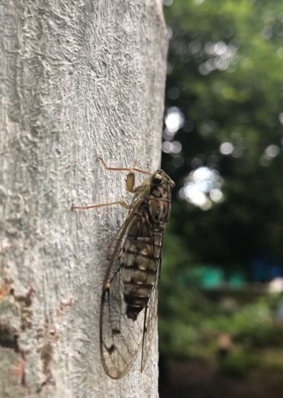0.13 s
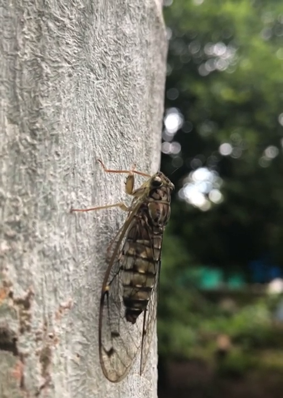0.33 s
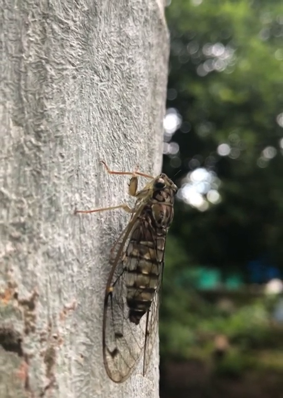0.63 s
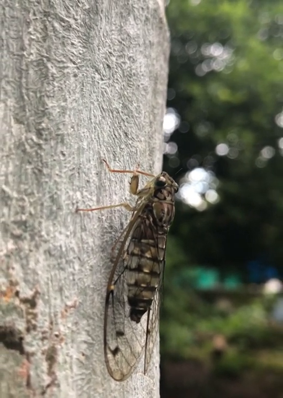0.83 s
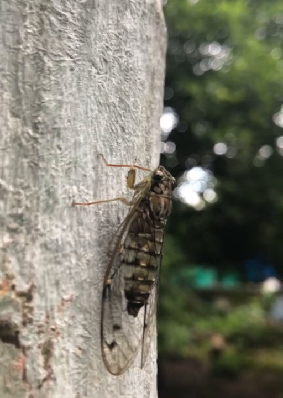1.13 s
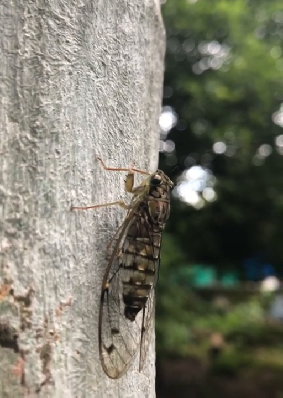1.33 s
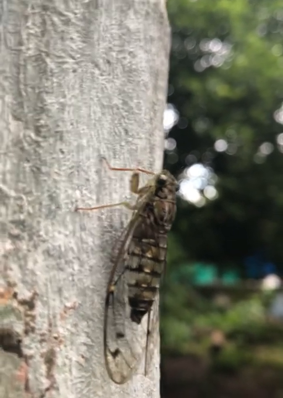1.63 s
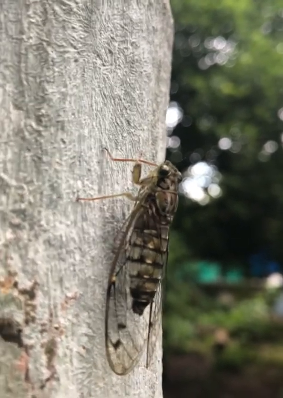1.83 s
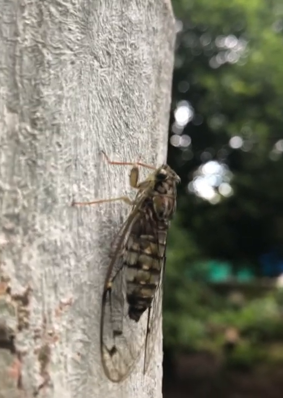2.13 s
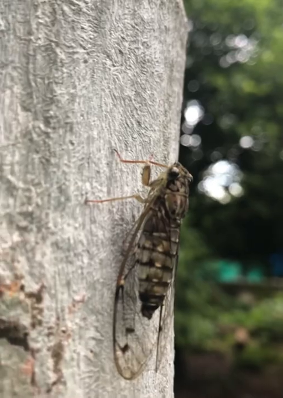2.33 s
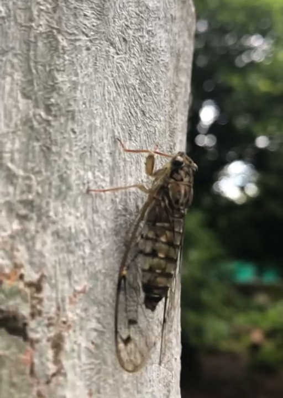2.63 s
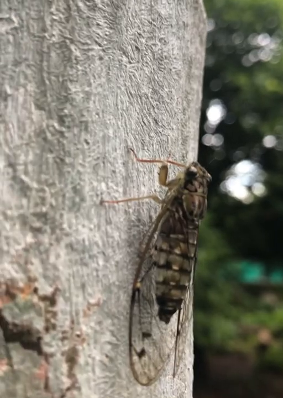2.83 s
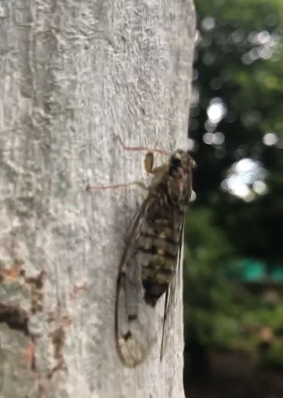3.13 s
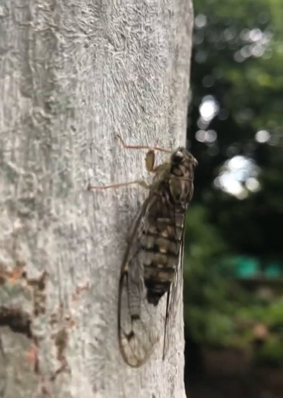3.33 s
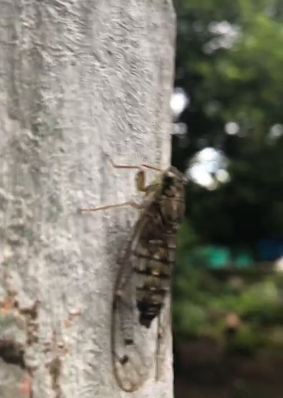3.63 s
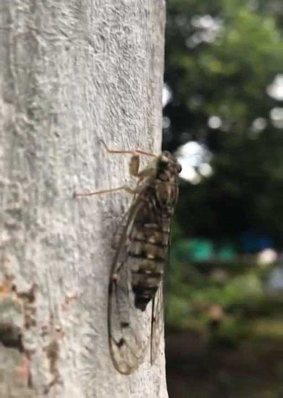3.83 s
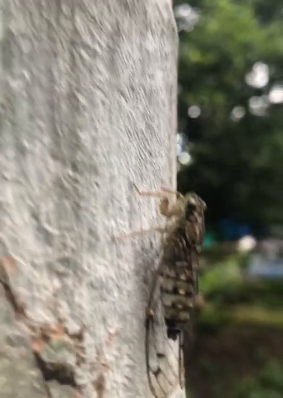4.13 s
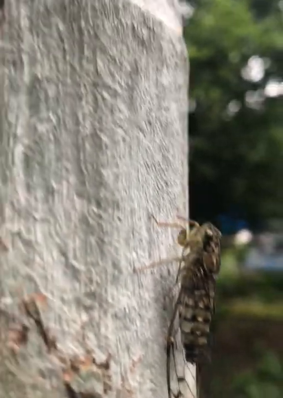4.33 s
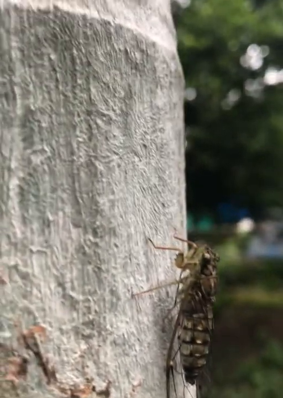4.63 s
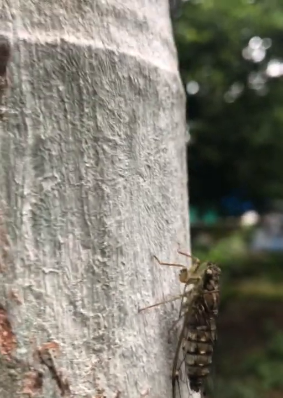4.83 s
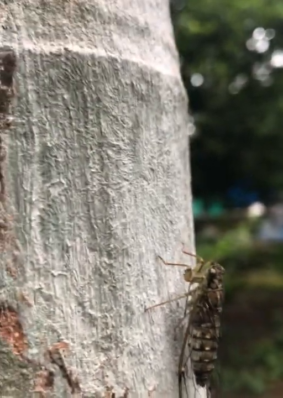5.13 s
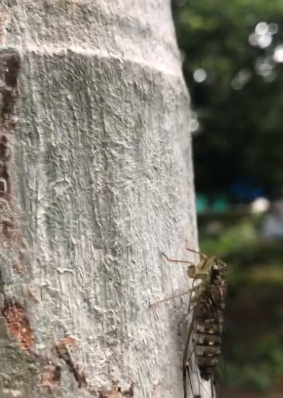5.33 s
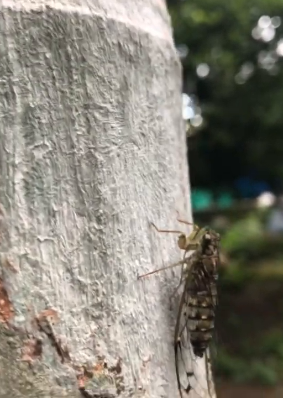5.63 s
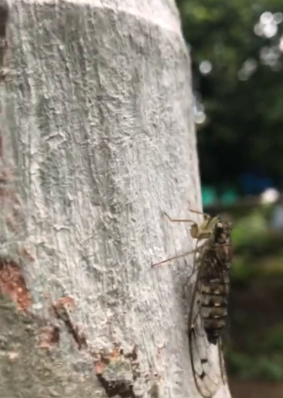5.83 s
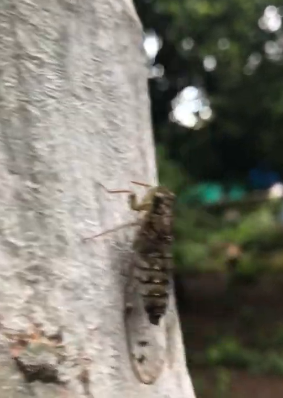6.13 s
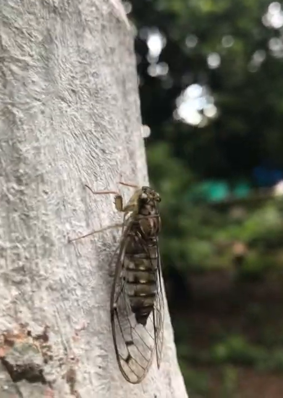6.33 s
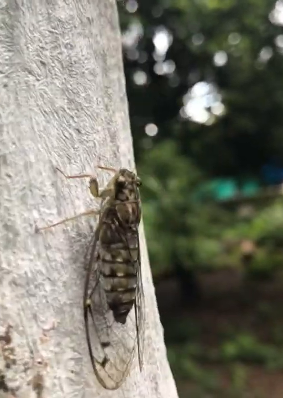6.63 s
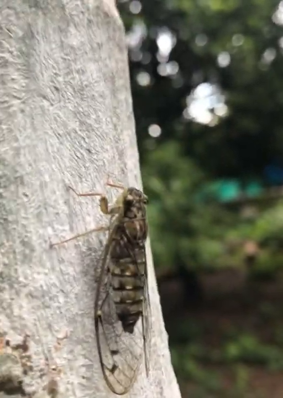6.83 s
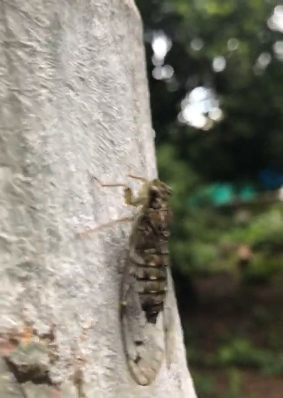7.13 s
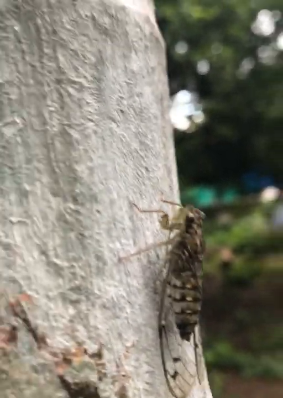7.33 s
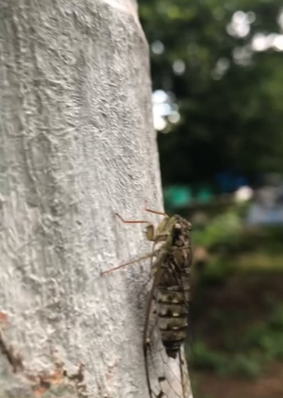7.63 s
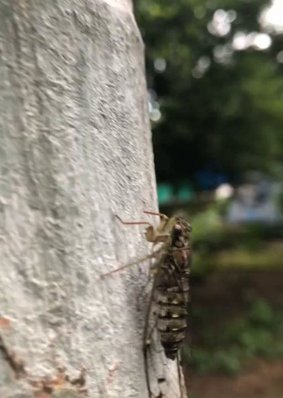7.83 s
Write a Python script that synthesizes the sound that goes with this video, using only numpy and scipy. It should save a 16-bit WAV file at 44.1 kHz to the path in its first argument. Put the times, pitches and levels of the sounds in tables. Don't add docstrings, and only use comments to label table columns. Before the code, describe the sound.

From 0 to 2.8 s a cicada, a hand's width from the phone, sings very loudly. Dense dry clicks form buzzing phrases about a tenth of a second long, roughly seven a second, each hurrying from loose, softer ticks into a bright ringing roll around 9 kHz over a 2 kHz rasp; pitch bobs slightly upward every 0.4 s. From 2.8 s phrases become tiny chirps of four to eight clicks, about twenty a second, still loud. After 4.1 s the level falls sharply, the chirps space out to about fourteen a second, and the high ring thins, leaving a lower, raspier tone. Brief surges come at 6.7, 7.35 and strongest at 7.7 s, then weak, crowded chirps. Distant cicadas shrill thinly throughout, clearer early and late. Far hoarse cock calls are nearly buried near 2, 4 and 6.3 s, clearest starting at 7.8 s. Soft air and low rumble lie beneath; almost no echo.

```python
import sys
import numpy as np
from scipy import signal
from scipy.fft import rfft, irfft, next_fast_len
from scipy.io import wavfile
from scipy.ndimage import uniform_filter1d, minimum_filter1d, map_coordinates

SR = 44100
rng = np.random.default_rng(int(sys.argv[2]) if len(sys.argv) > 2 else 0)


def how_loud(loudness_db):
    steps = np.asarray(loudness_db, float) / 20
    return 10 ** steps


def generate_wav(sig):
    pcm = np.round(np.clip(np.atleast_2d(sig).T, -1, 1) * 32767).astype(np.int16)
    wavfile.write(sys.argv[1], SR, pcm)


N = 351918


def unit(x):
    return x / np.sqrt(np.mean(x ** 2) + 1e-20)


def curves(rows, t):
    s, *columns = np.transpose(rows)
    return [np.interp(t, s, column) for column in columns]


def wobble(rate):
    knots = rng.standard_normal(int(N * rate / SR) + 4)
    return map_coordinates(knots, [np.arange(N) * rate / SR])


def filtered(x, response):
    size = next_fast_len(len(x) + 8192)
    spectrum = rfft(x, size) * response(np.fft.rfftfreq(size, 1 / SR))
    return irfft(spectrum, size)[:len(x)]


def hiss(spectrum):
    f, db = np.transpose(spectrum)
    colour = lambda hz: how_loud(np.interp(np.log(hz + 1), np.log(f), db, -120, -120))
    return unit(filtered(rng.standard_normal(N), colour))


def narrow(peaks):
    shape = lambda f: sum(how_loud(db) / (1 + (2 * (f - c) / w) ** 2) for c, w, db in peaks)
    return unit(filtered(rng.standard_normal(N), shape))


def cicada():
    s, db = buckles()
    luck = rng.standard_normal((len(s), 17))
    near = np.exp(-.5 * ((s[:, None] - s) / .15) ** 2)
    slow_db = near @ db / near.sum(1)
    jump_db = db - slow_db
    effort = np.clip((db + 9) / 7, 0, 1)[:, None]
    pause_ms = np.clip(np.abs(np.diff(s, prepend=0)) * 1000 - 3.6, 0, 20)[:, None]
    colours = overtone_balance(s, jump_db, pause_ms[:, 0])
    steps = np.arange(-130, 400)
    ms = steps * 1000 / SR
    rows = np.clip(np.round(s * SR).astype(int)[:, None] + steps, 0, N - 1)
    slip = np.cumsum((.025 + .11 * pause_ms) * luck[:, [1]], axis=0)
    turns = np.cumsum(rib_rate(np.arange(N) / SR)) / SR
    cycles = turns[rows] + slip
    pulse_db = slow_db + (1.1 - .8 * effort[:, 0]) * luck[:, 2]
    rasp = None
    pulse = np.zeros(rows.shape)
    for k, colour in enumerate(colours):
        scatter_db = 0 if k == 3 else .5
        base_db = pulse_db + colour + scatter_db * luck[:, 3 + k]
        pulse += overtone(k, ms, cycles, base_db, jump_db, effort, 1 + .05 * luck[:, [10 + k]])
    pulse += rib_scrape(rows, ms, slow_db + 0.55 * colours[2], effort, pause_ms)
    return np.bincount(rows.ravel(), pulse.ravel(), N)


# (level/dB, share of the effort followed, rise/ms, soft fall/ms,
# loud fall/ms, soft onset bend/Hz, loud onset bend/Hz, glide/Hz per ms, roughness)
OVERTONE_STACK = [
    (-0.5, -0.093, 0.59, 2.1, 2.03, 178, 343, 3, 0.044),
    (-3, -0.45, 1, 1.9, 2.6, 273, 185, -16, 0.079),
    (-6.5, 0.41, 1, 2.1, 0.45, 14, 18, 101, 0.13),
    (0.06, 0.97, 0.42, 1.2, 1.4, -150, -96, 35, 0.0074),
    (-0.6, 1, 0.29, 0.36, 1.9, -30, -30, 40, 0.21),
    (2.5, 1.2, 0.98, 0.32, 0.83, -200, -100, 74, 0.49),
    (-5, 1.3, 1, 2.6, 0.66, -200, -100, 74, .35),
]
AFTER_RING_DB = [-12, -11, -26, -32, -30, -34, -34]


def overtone(k, ms, cycles, base_db, jump_db, effort, uneven):
    gain_db, share, rise, soft, loud, soft_hz, loud_hz, glide_hz, rough = OVERTONE_STACK[k]
    level = how_loud(base_db + gain_db + share * jump_db)
    fall = (soft + (loud - soft) * effort) * uneven
    width_ms = np.where(ms < 0, rise * (1.3 - 0.32 * effort), fall)
    shape = np.exp(-.5 * np.abs(ms / width_ms) ** (2.6 - 0.76 * effort))
    after = np.exp(-np.abs(ms) / np.where(ms < 0, .3, 3)) * np.cos(ms / ms[-1] * np.pi / 2)
    shape += how_loud(AFTER_RING_DB[k]) * after
    bend_hz = (soft_hz + (loud_hz - soft_hz) * effort) * np.exp(-np.maximum(ms + 0.65, 0) / 0.46)
    off_hz = bend_hz + glide_hz * np.minimum(ms, 3.5)
    off_cycles = (np.cumsum(off_hz, axis=1) - off_hz[:, ms < 0].sum(1, keepdims=True)) / SR
    phase = 2 * np.pi * ((k + 1) * cycles + off_cycles)
    ribs = np.exp(-.5 * ((ms - ms[::12, None]) / .25) ** 2) * .8
    drift = rough * (1.4 - 0.84 * effort) * (rng.standard_normal((2, len(level), len(ribs))) @ ribs)
    return level[:, None] * shape * (1 + drift[0]) * np.sin(phase + drift[1])


# (f/Hz, level/dB)
SCRAPE_COLOUR = [(1300, -60), (1700, -11), (3300, -11), (5500, -0.5), (7600, 6), (10500, 7), (12000, -14.5),
                 (16200, -8)]


def rib_scrape(rows, ms, base_db, effort, pause_ms):
    rasp = hiss(SCRAPE_COLOUR)
    rasp_top = filtered(rasp, lambda hz: hz > 9600)
    hush = how_loud(-16 * effort * np.clip(1.6 - pause_ms, 0, 1))
    level = how_loud(base_db - 6.5 - 7.35 * effort[:, 0])[:, None]
    puff = np.exp(-.5 * (ms / np.where(ms < 0, .9, 1.6)) ** 2)
    return level * puff * (rasp[rows] + (hush - 1) * rasp_top[rows])


# (t/s, loss of the ring against the first overtone/dB,
# treble thrown back by the bark/dB)
BEAM_SWING = [(0, 4, 1), (1.4, 2, 0.5), (2.1, 0, -0.5), (2.7, 0, 0), (3.6, -1, 1.5), (4.05, 0.5, 2),
              (4.3, 2.5, 2), (4.7, 5.5, 2), (5.2, 7, 1.5), (5.7, 8.5, 2), (6.2, 10.5, 0.5), (6.7, 8.5, -3),
              (7.2, 11, 0), (7.6, 8.5, 0.5), (7.98, 7, 0.5)]
BESIDE_RING_DB = [-26, -29, -29, -27.5]
GAIN_PER_LOSS = [1.02, 1.674, 1.55, 0.065]
BARK_SHARE = [0, 0, 1, 1]


def overtone_balance(s, jump_db, pause_ms):
    off_db, bark_db = curves(BEAM_SWING, s)
    balance = np.c_[BESIDE_RING_DB] + np.c_[GAIN_PER_LOSS] * off_db + np.c_[BARK_SHARE] * bark_db
    first, second, third, upper = balance
    first = first + .3 * np.maximum(jump_db - 2, 0)
    second = second + 1.7 * np.minimum(pause_ms - 1, 2)
    return [first, second, third, 0, (third + upper) / 2, upper, upper]


# (t/s, length/ms, pulses, lazy pulses, soft part under the roll/dB)
LONG_PHRASES = [(0.0037, 85, 22, 7, 4.5), (0.1113, 129.7, 30, 16, 3.5), (0.2853, 108.8, 27, 8, 4),
                (0.4214, 130.7, 31, 16, 3.5), (0.5946, 108, 27, 8, 4.2), (0.7288, 92.6, 24, 6, 4.5),
                (0.8564, 96.5, 24, 8, 4), (0.996, 101.9, 26, 6, 4.5), (1.132, 100.2, 25, 6, 5),
                (1.272, 98.3, 24, 8, 4), (1.4175, 101.5, 26, 6, 4), (1.5539, 88, 23, 4, 5.5),
                (1.681, 96.2, 24, 6, 4.2), (1.8202, 99.7, 26, 4, 5.5), (1.9512, 79, 21, 2, 6),
                (2.0678, 104.7, 26, 6, 4.8), (2.2114, 90.1, 24, 2, 5.5), (2.3347, 65.5, 18, 2, 4.5),
                (2.441, 97.3, 25, 4, 4.5), (2.5766, 73.8, 20, 2, 3.5), (2.6786, 86.1, 22, 6, 3)]
# (t/s, length/ms, pulses, lazy pulses, surge over the chirps/dB)
LATE_RESTARTS = [
    (6.6921, 50.6, 8, 4, 1.5),
    (7.3529, 77.7, 13, 6, 7),
    (7.661, 88.8, 16, 7, 13),
]
# (t/s, pulses)
SHORT_CHIRPS = [(2.7865, 8), (2.8337, 7), (2.8828, 7), (2.9305, 5), (2.9739, 7), (3.0224, 6), (3.0677, 6),
                (3.114, 5), (3.1594, 5), (3.2068, 5), (3.2503, 5), (3.297, 5), (3.3406, 5), (3.3839, 5),
                (3.4299, 4), (3.4734, 4), (3.5183, 5), (3.5652, 5), (3.6112, 4), (3.6565, 4), (3.7067, 5),
                (3.7541, 4), (3.7986, 4), (3.8459, 4), (3.8971, 4), (3.9449, 4), (3.9981, 4), (4.0461, 4),
                (4.093, 4), (4.145, 4),
                (4.198, 5), (4.2513, 4), (4.3045, 4), (4.3587, 4), (4.4157, 4), (4.4732, 4), (4.5316, 4),
                  (4.5886, 4), (4.6413, 4), (4.7046, 4), (4.7688, 4), (4.8293, 4), (4.8949, 4), (4.9628, 4),
                  (5.0217, 4), (5.0841, 4), (5.1434, 4), (5.2069, 4), (5.2697, 3), (5.3301, 4), (5.3974, 4),
                  (5.4639, 4), (5.5354, 4), (5.6054, 4), (5.6737, 4), (5.7437, 4), (5.8149, 4), (5.8894, 4),
                  (5.9592, 3),
                (6.0261, 4), (6.0956, 4), (6.1768, 4), (6.2518, 4), (6.328, 4), (6.4131, 3), (6.4887, 4),
                (6.5697, 3), (6.6473, 3), (6.8135, 5), (6.8974, 4), (6.9757, 4), (7.0472, 4), (7.122, 4),
                (7.1999, 4), (7.2778, 4), (7.5095, 5), (7.5933, 4), (7.8084, 4), (7.8461, 3), (7.8955, 4),
                (7.932, 2), (7.9527, 2), (7.9691, 2)]
# (t/s, peak level/dB)
SONG_STRENGTH = [(0, -2.26), (4.08, -1), (4.145, -3.5), (4.25, -7), (4.36, -7.5), (4.63, -7.5), (4.72, -10),
                 (5.3, -8), (5.55, -9.5), (6.1, -10.5), (6.4, -13), (6.52, -9.5), (6.7, -10.5), (6.85, -15),
                 (7.05, -13), (7.33, -17), (7.62, -14.5), (7.85, -13)]
WEAK_TURNS = [1.0707, 1.078, 1.085, 1.094]


def buckles():
    long_s, long_db = phrases(LONG_PHRASES, 0)
    late_s, late_db = phrases(LATE_RESTARTS, 1)
    short_s = chirps(SHORT_CHIRPS)
    s = np.r_[long_s, short_s, late_s]
    db = np.r_[long_db, 0 * short_s, late_db]
    db[np.abs(s - np.c_[WEAK_TURNS]).argmin(1)] += -5
    return s, db + curves(SONG_STRENGTH, s)[0]


def phrases(rows, lifted):
    roll_ms, swing, unsteady, climb_pulses = 3.75, .075, .05, 7
    times, levels = [], []
    for s, ms, count, lazy, climb_db in rows:
        k = np.arange(int(count))
        lazy_ms = (ms - roll_ms * (count - 1 - lazy)) / lazy
        pairing = swing * (2 * (k[:-1] % 2) - 1)
        scatter = unsteady * rng.standard_normal(len(k) - 1)
        gaps = np.where(k < lazy, lazy_ms, roll_ms)[:-1] * (1 + pairing + scatter)
        times.append(s + ms / 1000 * np.r_[0, np.cumsum(gaps)] / gaps.sum())
        climb = np.sin(np.clip((k - lazy) / climb_pulses, 0, 1) * np.pi / 2) ** 2
        levels.append(climb_db * (climb - 1 + lifted))
    return np.concatenate(times), np.concatenate(levels)


# (t/s, gap between chirp pulses/ms, share of the drag)
CHIRP_PACE = [(2.79, 3.9, 0), (2.9, 4.4, 0), (3.15, 4.7, 0), (3.45, 5.1, 1), (4.0, 5.6, 1), (4.6, 5.95, 1),
              (5.2, 6.5, 1), (6.2, 6.9, 1), (6.9, 6.9, 1), (7.6, 7.1, 1), (7.81, 8, 1)]


def chirps(rows):
    times = []
    for s, count in rows:
        gap_ms, drag = curves(CHIRP_PACE, s)
        gaps = gap_ms * (1 + .11 * drag * (np.arange(int(count) - 1) - 1))
        times.append(s + np.r_[0, np.cumsum(gaps)] / 1000)
    return np.concatenate(times)


# (t/s, f/Hz)
REST_RATE = [(0, 2130), (2.0, 2145), (2.7, 2160), (2.85, 2191), (3.85, 2181), (5.6, 2066), (5.97, 2085),
             (6.5, 2039), (7.6, 2012), (7.98, 2040)]
# (t from its top/s, added f/Hz)
PUMP_SHAPE = [(-.11, -0.5), (-.03, 108.5), (0, 122), (.02, 90), (.06, 60), (.075, 11), (.135, 60), (.21, 0)]
# (t/s, depth)
BELLY_PUMPS = [
    (-.07, 0.64),
    (.235, 0.96),
    (.537, 1.07),
    (.934, 1.05),
    (1.357, 0.99),
    (1.758, 0.85),
    (2.147, 0.73),
    (2.514, 0.54),
    (2.75, 0.38),
]


def rib_rate(t):
    pumps = sum(depth * curves(PUMP_SHAPE, t - s)[0] for s, depth in BELLY_PUMPS)
    surges = 0
    for s, ms, _, _, db in LATE_RESTARTS:
        pull = np.interp(t - s - ms / 1000, [-.035, 0, .03], [0, 1, 0])
        surges = surges + 7.5 * db * pull
    return curves(REST_RATE, t)[0] + pumps + surges


def trees(x):
    t = np.arange(SR // 4) / SR
    tail = rng.standard_normal(len(t)) * how_loud(-60 * t / .1) * (t > .003)
    return signal.fftconvolve(x, tail / np.linalg.norm(tail))[:N]


# (t/s, level/dB)
CHORUS_LEVEL = [(0, -39.5), (1.5, -39), (3, -49), (4.3, -50), (5, -45.5), (6, -43), (7, -43), (7.98, -44.5)]
# (f/Hz, width/Hz, level/dB)
NEIGHBOUR_PEAKS = [(2385, 120, -11), (4650, 400, -18), (7000, 1200, -27), (9350, 520, 0), (14000, 700, -30)]


def chorus(t):
    swell_db = 1.5 * wobble(5) + 2 * wobble(200)
    return how_loud(curves(CHORUS_LEVEL, t)[0] + swell_db) * narrow(NEIGHBOUR_PEAKS)


# (t/s, length/s, f/Hz, width/Hz, level/dB, octave level/dB)
COCK_CALLS = [
    (-.2, .55, 580, 90, -64, -12),
    (1.9, .8, 590, 110, -62, -6),
    (3.33, .14, 1075, 25, -67, -30),
    (3.83, 1.05, 605, 80, -61, -7),
    (4.7, .27, 860, 50, -70, -20),
    (6.25, .7, 415, 25, -66.5, -12),
    (7.8, .6, 620, 70, -55, -3),
]


def cock(t):
    out = np.zeros(N)
    for s, length, hz, width, db, octave_db in COCK_CALLS:
        arch = np.clip(np.minimum((t - s) / 0.017, 3 * (s + length - t) / length), 0, 1)
        strength = how_loud(db + 2 * wobble(9)) * arch
        out += strength * narrow([(hz, width, 0), (2 * hz, 1.3 * width, octave_db)])
    return out


# (t/s, rumble level/dB, air level/dB)
GARDEN_LEVELS = [(0, -60.5, -63), (2, -64, -63.5), (3.3, -65, -61.5), (4.3, -66.5, -64.5), (4.8, -62, -65),
                 (5.2, -58, -60.5), (6, -58.5, -59), (7, -58.5, -57), (7.98, -59, -57.5)]
# (f/Hz, level/dB per Hz)
RUMBLE_COLOUR = [(20, -35), (33, -12), (46, -6), (65, 3), (180, -3), (300, -12), (500, -10), (900, -34)]
# (f/Hz, level/dB per Hz)
AIR_COLOUR = [(250, -10), (450, -5.5), (1200, -9), (1900, -9.5), (3300, -11.5), (16000, -43)]


def garden(t):
    rumble_db, air_db = curves(GARDEN_LEVELS, t)
    rumble = how_loud(rumble_db + 0.76 * wobble(3.02)) * hiss(RUMBLE_COLOUR)
    return rumble + how_loud(air_db) * hiss(AIR_COLOUR)


def scene():
    t = np.arange(N) / SR
    song = cicada()
    echo = how_loud(-47) * trees(song)
    ground = garden(t)
    return (song + echo + chorus(t) + cock(t) + ground)[None]


def roll_off(x):
    return signal.sosfilt(signal.butter(12, 17140, fs=SR, output="sos"), x)


def record(dry):
    need = np.minimum(1, .97 / (np.abs(dry[0]) + 1e-9))
    held = dry[0] * uniform_filter1d(minimum_filter1d(need, size=81), size=41)
    hum = filtered(held ** 2, lambda hz: 1 / (1 + (150 / (hz + 1)) ** 4) / (1 + (hz / 330) ** 4))
    mix = filtered(held + how_loud(-40.0) * hum, lambda hz: 1 / (1 + (hz / 15730) ** 120))
    return roll_off(mix[None])


dry = scene()
out = record(dry)
generate_wav(out)
```